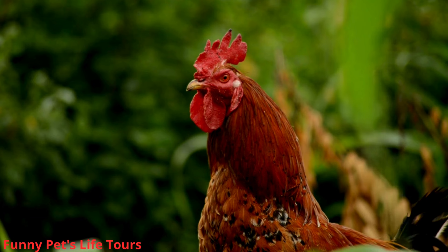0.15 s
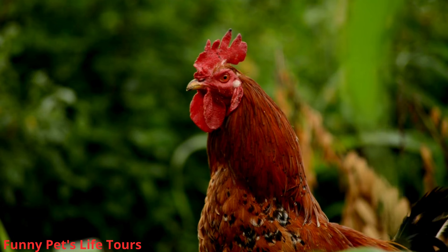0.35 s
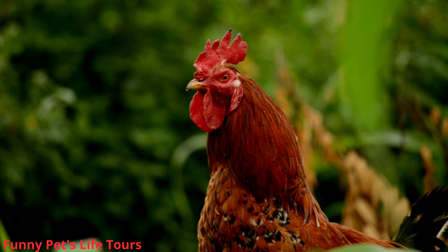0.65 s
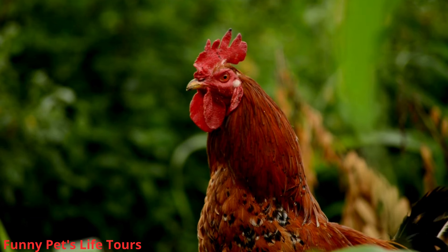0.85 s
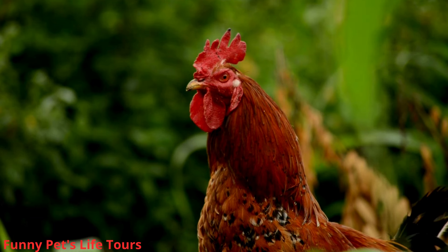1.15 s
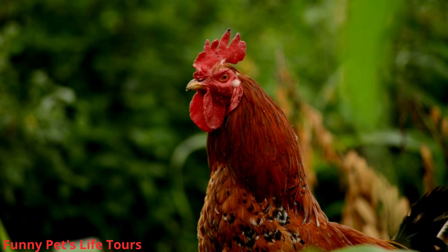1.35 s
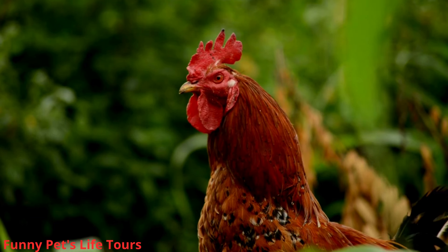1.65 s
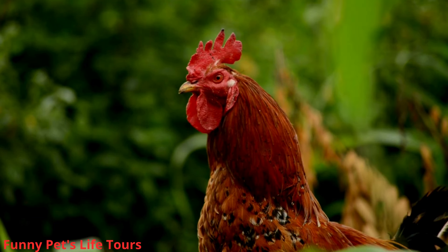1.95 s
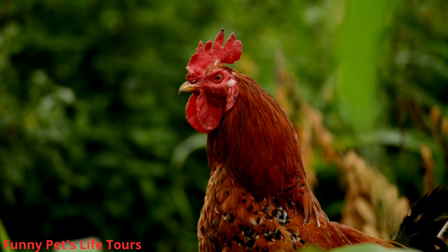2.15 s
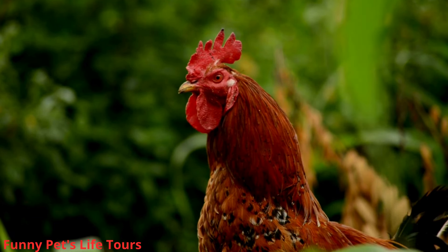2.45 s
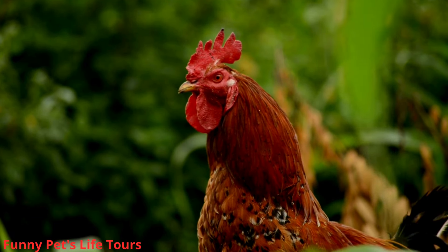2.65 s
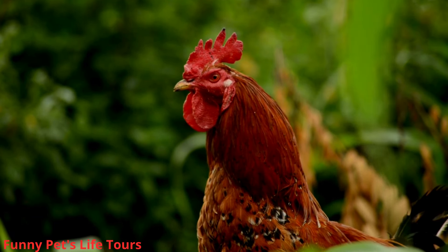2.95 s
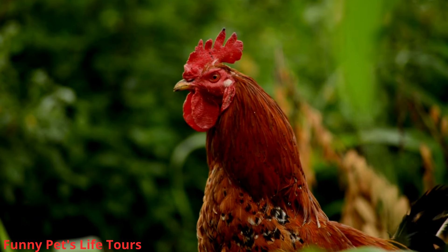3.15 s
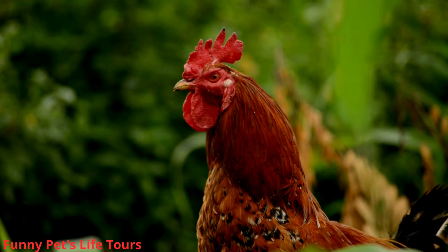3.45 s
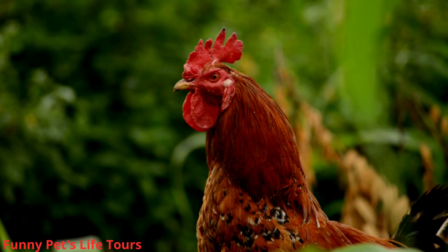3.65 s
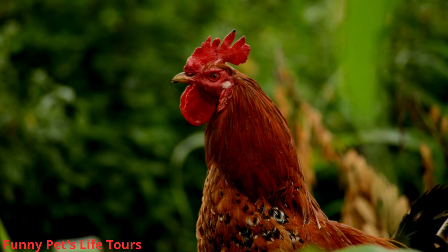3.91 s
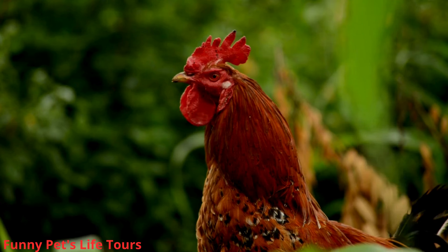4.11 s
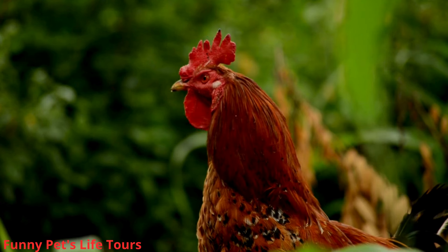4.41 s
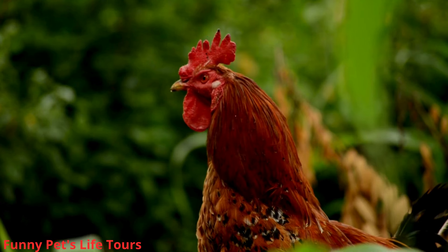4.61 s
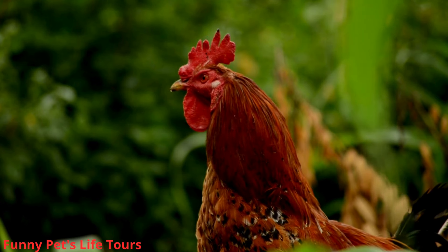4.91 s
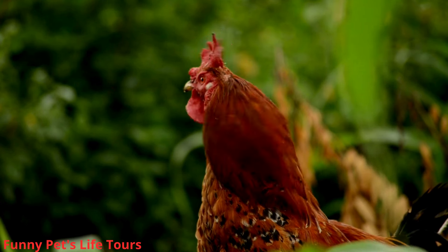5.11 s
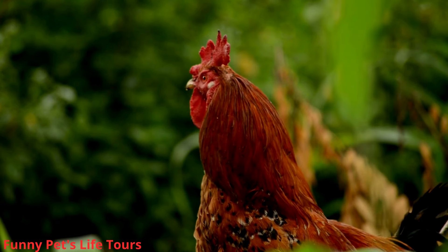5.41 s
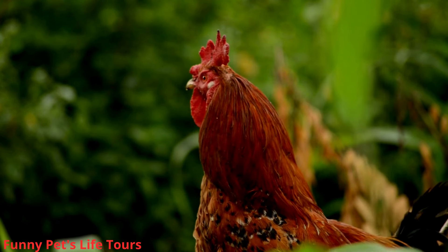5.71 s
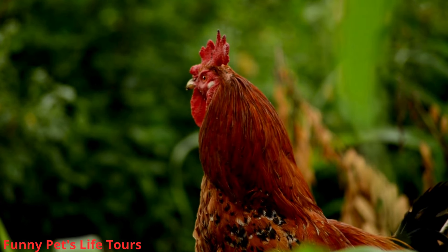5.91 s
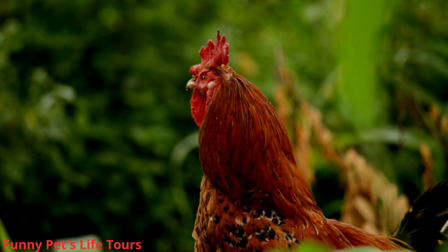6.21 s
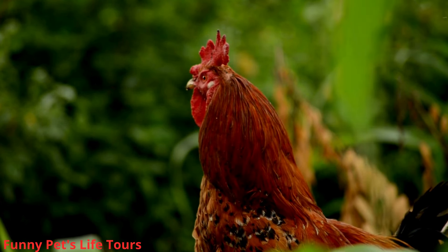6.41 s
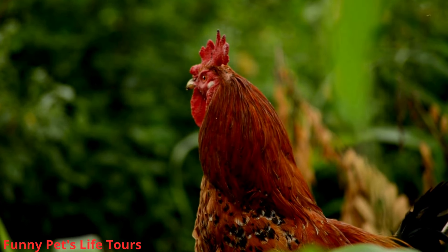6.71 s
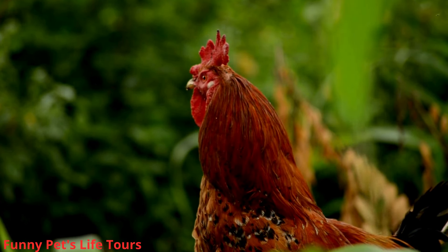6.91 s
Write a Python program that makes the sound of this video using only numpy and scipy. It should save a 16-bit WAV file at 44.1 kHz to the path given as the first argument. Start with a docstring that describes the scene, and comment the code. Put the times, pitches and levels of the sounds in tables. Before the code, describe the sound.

A rooster crows loudly close by in a breezy farmyard, hoarse then ringing on a long clear note; after near silence, a second crow begins.

```python
"""A farmyard, where a rooster crows close by: two hoarse syllables, a cracked one and a clear held note.
Two tone stacks, one for each side of his voice box, overlap and throb; filtered noise is his windpipe rasp.
Beak treble is coloured pulses and noise when hoarse, steady partials when clear; the yard adds a noise echo.
Far fowl, small birds and a motor hum are tones and narrow noise; wind, air, leaves and wash are coloured noise.
The sound fades almost to silence, then a second crow starts."""
import sys
import numpy as np
from scipy import signal
from scipy.fft import rfft, irfft, next_fast_len
from scipy.io import wavfile
from scipy.ndimage import uniform_filter1d

SR = 44100
rng = np.random.default_rng(int(sys.argv[2]) if len(sys.argv) > 2 else 0)


def wav_out(sig):
    """Save sig, one row per channel (or a flat mono array), as 16-bit PCM at SR to the path in sys.argv[1]."""
    wavfile.write(sys.argv[1], SR, np.round(np.clip(np.atleast_2d(sig).T, -1, 1) * 32767).astype(np.int16))


N = 311346
T = np.arange(N) / SR
# when each crow of the rooster starts: (first [s], second [s])
CROW_STARTS_S = (2.55, 6.025)
WIND_ENDS_S = 5.4   # the far wash stops here too


def amp(db):
    """Decibels to gain."""
    return 10 ** (np.asarray(db) / 20)


def rms_one(x):
    """Scale to rms 1."""
    return x / np.sqrt(np.mean(x ** 2) + 1e-20)


def in_time(tables):
    """Columns of one or more curve tables, joined, at every sample."""
    s, *columns = np.vstack(tables).T
    return [np.interp(T, s, column) for column in columns]


def sounding(tables, edge=.012):
    """1 while any table lasts, 0 between, with ramps of `edge` seconds outside it."""
    gates = []
    for table in tables:
        since_start = T - table[0][0] + edge
        until_end = table[-1][0] + edge - T
        gates.append(np.clip(np.minimum(since_start, until_end) / edge, 0, 1))
    return np.max(gates, axis=0)


def swell(start, length, edge):
    """Rises, holds and falls; each ramp takes the share `edge` of the length."""
    return np.clip(np.minimum(T - start, start + length - T) / (edge * length), 0, 1)


def at_hz(points, hz):
    """A spectrum table read on a log frequency axis."""
    table_hz, table_db = np.array(points).T
    return np.interp(np.log(np.maximum(hz, 1)), np.log(table_hz), table_db)


def coloured(spectrum, x=None, low_hz=0, high_hz=SR):
    """A sound (white noise if none) shaped by a spectrum between two edges, rms 1."""
    size = next_fast_len(N)
    hz = np.arange(size // 2 + 1) * SR / size
    inside = (hz >= max(low_hz, spectrum[0][0])) & (hz <= min(high_hz, spectrum[-1][0]))
    x = rng.standard_normal(N) if x is None else x
    return rms_one(irfft(rfft(x, size) * amp(at_hz(spectrum, hz)) * inside, size)[:N])


def drift(rate_hz):
    """Slow chance with spread 1: noise through two equal low-pass poles."""
    r = np.exp(-16 * np.pi * rate_hz / SR)   # made at an eighth of the sample rate
    white = rng.standard_normal(N // 8 + 4002)
    slow = signal.lfilter([1], [1, -2 * r, r * r], white)[4000:]   # settled part
    return np.interp(np.arange(N) / 8, np.arange(len(slow)), rms_one(slow))


def resonate(x, hz, width_hz):
    """One resonance, gain about 1 on top."""
    r = np.exp(-np.pi * width_hz / SR)
    poles = [1, -2 * r * np.cos(2 * np.pi * hz / SR), r * r]
    return signal.lfilter([(1 - r * r) / 2, 0, (r * r - 1) / 2], poles, x)


def cycles(hz):
    """Running phase of a pitch curve [rad]."""
    return 2 * np.pi * np.cumsum(hz) / SR


def moving_band(hz, width_hz):
    """Narrow noise around a moving centre, rms about 1: two drifts on a sine and a cosine."""
    phase = cycles(hz)
    return drift(width_hz) * np.sin(phase) + drift(width_hz) * np.cos(phase)


def last_crow_ringing():
    """The yard still rings with the crow before: narrow noise bands die away."""
    # ringing bands: (centre [Hz], level at the start [dB], time to fall 60 dB [s])
    ringing = [(666, -53.5, 0.26), (1380, -52.5, 0.5), (2070, -65, 0.25), (554, -49, 0.2)]
    return sum(amp(db - 60 * T / t60) * moving_band(hz + 0 * T, 15.0) for hz, db, t60 in ringing)


def wind():
    """Low noise: a wavering breeze that swells in gusts on the microphone."""
    # gusts: (start [s], length [s], level above the breeze [dB])
    gusts = [(0.147, 0.39, 3), (.97, 0.089, 10.5), (1.78, .12, 9.5), (2.59, 0.049, 13.5),
             (3.37, 0.39, 10.5), (3.92, 0.58, 11.5), (4.616, 0.73, 5.5)]
    # colour of the wind: (frequency [Hz], relative density [dB per Hz])
    wind_tone = [(12, -33), (20, 4.5), (39, -4), (123, -23), (151, -26.5), (220, -35), (250, -38),
                 (320, -61.5), (550, -120)]
    breeze_db, swing_db = -58, 2.5
    gust_db = sum(db * swell(s, length, edge=0.21) for s, length, db in gusts)
    level = amp(breeze_db + gust_db + swing_db * drift(12))
    return level * coloured(wind_tone) * sounding([[(0,), (WIND_ENDS_S,)]])


def air():
    """Steady outdoor air: low and middle noise whose level wavers."""
    # colour of the air: (frequency [Hz], relative density [dB per Hz])
    air_tone = [(59, -32), (100, 0.5), (285, -3.5), (394, -5), (484, -4), (611, -8.5), (2200, -22.5),
                (2860, -44.5), (4840, -120)]
    level_db, swing_db = -66.5, 3.0
    return amp(level_db + swing_db * drift(4)) * coloured(air_tone)


def leaves():
    """Leaf hiss: bright noise that follows a slow level curve."""
    # strength of the hiss: (time [s], level [dB])
    leaf_levels = [(0.0, -73), (0.95, -71), (2.14, -68.5), (4.7, -73), (5.05, -74)]
    # colour of the leaves: (frequency [Hz], relative density [dB per Hz])
    leaf_tone = [(1060, -36), (1800, 0), (1970, -3), (3710, -3.5), (4640, -5.5), (9140, -12),
                 (15600, -23.5)]
    return amp(in_time([leaf_levels])[0]) * coloured(leaf_tone)


def far_wash():
    """A far wash of farm noise: dull noise under a level curve."""
    # strength of the wash: (time [s], level [dB])
    wash_levels = [(0.0, -62), (0.72, -62), (1.46, -74), (2.5, -69), (4.75, -63), (5.05, -65)]
    # colour of the wash: (frequency [Hz], relative density [dB per Hz])
    wash_tone = [(150, -23.5), (250, -0.5), (1400, -2.5), (1640, -8), (1900, -12.5), (2480, -20.5),
                 (2600, -18.5), (3380, -48), (5720, -120)]
    level = amp(in_time([wash_levels])[0] + 1.3 * drift(10))
    return level * coloured(wash_tone) * sounding([[(0,), (WIND_ENDS_S,)]])


def motor_hum():
    """A far motor hum comes and goes: low sines waver in pitch and level."""
    # hum tones: (start [s], length [s], pitch [Hz], peak level [dB])
    hums = [(0.17, 1.4, 76, -62), (0, .3, 76, -58), (4, 0.85, 90, -60), (0, 0.59, 117, -65),
            (2.5, 1.1, 117, -61), (4.5, 0.54, 117, -60.5), (3.5, .35, 200, -67)]
    out = 0
    for s, length, hz, db in hums:
        tone = np.sin(cycles(hz * (1 + 0.018 * drift(4))))
        out = out + amp(db + 3.3 * drift(4.6)) * tone * swell(s, length, edge=0.05)
    return out


def clucks():
    """Short clucks: a noise puff excites a narrow throat resonance and a broad one."""
    # clucks: (start [s], relative level [dB], throat resonance [Hz])
    cluck_list = [(.19, -56, 1554), (.32, -68, 2510), (4.815, -54, 1510), (4.945, -65, 2560),
                  (4.95, -71, 3750), (5.18, -51, 1004), (5.185, -64, 3750)]
    out = 0
    for s, db, hz in cluck_list:
        age = np.maximum(T - s, 0) / 0.019   # the puff peaks 19 ms after its start
        puff = age * np.exp(1 - age) * rng.standard_normal(N) + 1e-18
        out = out + amp(db) * (9 * resonate(puff, hz, 53) + 0.44 * resonate(puff, 1900, 780))
    return out


def far_cock():
    """A far cock holds a note: harmonics of one wavering pitch, each drifting in level."""
    # held notes: (start [s], length [s], pitch [Hz], reference level [dB])
    notes = [(.33, 0.65, 405.5, -83), (2.197, 0.48, 398.5, -80)]
    # his tone: (multiple of the pitch, level re the note's reference [dB])
    far_partials = [(3, -46), (4, 1.5), (5, 4.5), (6, 7), (7, 8), (8, -17), (9, 3.5), (10, -0.5)]
    out = 0
    for s, length, hz, level_db in notes:
        phase = cycles(hz * (1 + 0.0064 * drift(2.96)))
        stack = sum(amp(db + 3.5 * drift(6)) * np.sin(k * phase) for k, db in far_partials)
        out = out + amp(level_db) * stack * swell(s, length, edge=.15)
    return out


def small_birds():
    """Small birds in the trees: narrow bands of noise that swell and waver."""
    # twitters: (start [s], length [s], centre [Hz], level [dB])
    twitters = [(.65, .35, 4030, -78), (1.38, 0.54, 3790, -73.5), (1.95, .3, 3720, -79)]
    out = 0
    for s, length, hz, db in twitters:
        band = moving_band(hz + 0 * T, 310.0)
        out = out + amp(db + 2 * drift(10)) * band * swell(s, length, edge=.2)
    return out


def hen():
    """A hoarse hen call sinks far off: a noise band follows her throat resonance."""
    # the call: (time [s], throat resonance [Hz], level [dB])
    hen_curve = [(1.05, 1067, -76), (1.1, 1204, -63.5), (1.2, 1108, -65), (1.31, 972, -58.5),
                 (1.43, 873, -73), (1.52, 787, -67), (1.55, 683, -60), (1.65, 599, -77)]
    hz, level_db = in_time([hen_curve])
    band = moving_band(hz, 176.0)
    return amp(level_db + 1.4 * drift(5.5)) * band * sounding([hen_curve], edge=0.033)


def membrane(pitch_hz, levels_db, hoarse, wobble, flutter_db):
    """The low partials of one side; hoarseness shakes pitch and strength. Returns sound and phase."""
    phase = cycles(pitch_hz * (1 + wobble * hoarse * drift(45)))
    partials = []
    for k, db in enumerate(levels_db, start=1):
        partials.append(amp(db + flutter_db * hoarse * drift(32)) * np.sin(k * phase))
    return np.sqrt(2) * sum(partials), phase


def windpipe_rasp():
    """Breath noise through the windpipe: each resonance acts twice, with alternating sign; rms 1."""
    # resonances: (centre [Hz], width of each pass [Hz], relative level [dB])
    windpipe = [(674, 140, 3), (1064, 180, 6), (1232, 430, -7.5), (1514, 210, 7.5), (2003, 200, 4.5),
                (2329, 180, -17.5)]
    white = rng.standard_normal(N)
    pipe = 0
    for k, (hz, width, db) in enumerate(windpipe):
        pipe = pipe + (-1) ** k * amp(db) * resonate(resonate(white, hz, width), hz, width)
    return rms_one(pipe)


def pulses(phase):
    """Sharp pulses, one a cycle, unevenly timed: equal partials 4 to 19, rms 1."""
    shaken = phase + .06 * drift(150)
    return rms_one(sum(np.sin(k * shaken) for k in range(4, 20)))


def evened(x):
    """Level held near rms 1 over about 32 ms."""
    return x / np.sqrt(uniform_filter1d(x * x, size=1400) + 1e-8)


def beak(phase, high_phase, both, hoarse, uneven, posture, bands_db):
    """Treble: shaky pulses and hiss through the throat when hoarse, steady partials when clear."""
    # beak and throat colour in the first syllable: (frequency [Hz], relative density [dB per Hz])
    opening = [(1350, -48), (2300, -18), (2510, -14.5), (3070, 3.5), (3600, -25.5), (4960, 3.5),
               (5460, -8.5), (5820, -43.5), (6300, -15), (7820, -10), (9110, -31), (9630, -19.5),
               (11300, -31), (12200, -16.5), (15600, -30)]
    # the same in the strained and cracked syllables: (frequency [Hz], relative density [dB per Hz])
    middle = [(1350, -37), (2300, -22.5), (2700, -8), (3040, -1.5), (3540, -26), (4400, -3.5), (5000, -6),
              (5590, -23), (6150, -25), (6550, -21.5), (6850, -11), (7150, -20.5), (7550, -12.5),
              (8410, -15), (10000, -21.5), (10900, -43.5), (12600, -31.5), (15600, -42)]
    # the same as the held note lets go: (frequency [Hz], relative density [dB per Hz])
    closing = [(1350, -50), (2300, -24.5), (3000, -0.5), (3190, -15.5), (4360, -20.5), (4690, -2),
               (6150, 4.5), (6990, -24.5), (7640, -14), (8010, -14), (15600, -31.5)]
    # treble of the held note: (multiple of the pitch, relative level [dB])
    clear_partials = [(4, -27.5), (5, -48.5), (6, -37.5), (7, -40.5), (8, -47.5), (9, -41.5), (10, -37),
                      (11, -42.5), (12, -49), (13, -56.5), (14, -47), (15, -55.5), (16, -59.5), (17, -54.5),
                      (18, -50.5), (19, -67.5), (20, -57), (21, -69.5), (22, -71)]
    # change after the held note slips: {multiple of the pitch: level change [dB]}
    slip_db = {6: -22, 7: 0.5, 8: 11, 10: -10}
    # borders of the separately levelled bands: (each border [Hz])
    edges_hz = (2200, 3700, 5900, 10600, 15700)
    slip_s = 4.405   # just before the held note ends

    hiss_share = .55 * hoarse
    puffs = 1 + np.sin(phase)     # air escapes once a cycle
    rough = np.sqrt(1 - hiss_share) * (uneven * pulses(phase) + both * pulses(high_phase))
    rough += np.sqrt(hiss_share) * puffs * rng.standard_normal(N)
    colour = np.interp(posture, [1, 2, 5, 6], [0, 1, 1, 2])   # crossfades the three colours
    rough = sum(np.clip(1 - abs(colour - k), 0, 1) * coloured(tone, rough)
                for k, tone in enumerate([opening, middle, closing]))

    slipped = np.clip((T - slip_s) / 0.0068, 0, 1) * (T < CROW_STARTS_S[1])
    clear = 0
    for k, db in clear_partials:
        level = amp(db + 5 * drift(5) + slip_db.get(k, 0) * slipped)
        clear = clear + level * np.sin(k * phase + k * k)   # k * k scatters the phases

    strained = np.clip(hoarse / .35, .18, 1)
    flat = [(10, 0), (SR, 0)]
    out = 0
    for low_hz, high_hz, db in zip(edges_hz, edges_hz[1:], bands_db):
        harsh = evened(coloured(flat, rough, low_hz, high_hz))
        steady = evened(coloured(flat, clear, low_hz, high_hz))
        mix = strained * amp(1.8 * drift(25)) * harsh + np.sqrt(1 - strained ** 2) * steady
        out = out + amp(db) * mix
    return out


def rooster():
    """Both sides of the voice box, rasp in the windpipe and the treble from the beak."""
    # the tune of every crow, lower side of the voice box: (time after the start [s], pitch [Hz])
    tune = [(-.02, 465), (.02, 486.4), (.05, 514.7), (.13, 536), (.23, 525), (.25, 568.6), (.275, 649.2),
            (.68, 646.9), (.76, 610), (.87, 605), (.95, 616), (1.1, 615), (1.105, 694.3), (1.165, 702.7),
            (1.2, 699), (1.22, 692.9), (1.24, 694), (1.895, 693), (1.91, 677.6), (1.92, 621), (1.95, 602.6),
            (2.05, 591)]
    # (time after the start [s], row of voicings, hoarseness [0-1], breathiness [0-1])
    postures = [(-.05, 0, .6, .3), (.025, 0, .5, 0), (.055, 1, .45, 0), (.1, 1, .3, 0), (.22, 1, .5, 0),
                (.245, 2, .8, 1), (.275, 2, .8, 0), (.69, 2, .8, 0), (.74, 2, .85, .7), (.84, 2, .85, 1),
                (.88, 3, .85, 1), (.93, 3, .8, .3), (.98, 3, .6, 0), (1.02, 3, .34, 0), (1.1, 3, .35, 0),
                (1.115, 4, .33, 0), (1.2, 4, .2, 0), (1.23, 5, 0, 0), (1.8, 6, 0, 0), (1.9, 6, 0, 0),
                (1.918, 7, .8, 0), (3.0, 7, .8, 0)]
    # one row a posture, from the attack to letting go: (2nd, 3rd, 4th partial, rasp [dB re overtones],
    # treble near 4.7 kHz, at 6-10 kHz, at the top [dB re treble])
    voicings = [(-9, 0.5, -16.5, -10.5, -2.5, -15, -23), (-1, -11, -6.5, -6, -3, -7.5, -18),
                (-3, -5.5, -24, -6, -1, -4, -22.5), (0, -10.5, -37.5, -6, -0.5, -7, -16.5),
                (2.4, -15, -28.5, -22, 1.5, -13.5, -19.5), (1.9, -5.5, -61, -50.5, -2, -3, -8),
                (1, -20, -63, -55, 0, -3, -21.5), (-3.5, -22, -50, -5.5, -3.5, -1, -17.5)]
    # effort in stretches of the crows: (time [s], fundamental [dB], overtones [dB],
    # ring near 3 kHz [dB], treble [dB])
    effort = [
        [(2.53, -74, -75, -73, -72), (2.54, -57, -66, -70, -77), (2.568, -48, -35.5, -53.5, -53.5),
         (2.614, -39.5, -37, -51, -49.5), (2.654, -46, -42, -58, -49), (2.662, -42, -42, -52, -50),
         (2.706, -52, -41, -55, -48), (2.742, -73, -44, -64, -57.5), (2.776, -66, -68, -66, -65),
         (2.79, -61, -51, -70, -76)],
        [(2.79, -41, -55, -71, -75), (2.824, -36, -36.5, -50, -57), (2.85, -23, -32.5, -45, -51),
         (2.882, -35.5, -32.5, -45, -48.5), (2.904, -28.5, -28.5, -42, -49.5), (3.014, -32, -34.5, -45, -47.5),
         (3.192, -28, -28.5, -43.5, -47), (3.322, -44.5, -38, -48, -51), (3.382, -38.5, -47.5, -56.5, -65.5),
         (3.41, -42, -50, -51, -65)],
        [(3.41, -46, -47.5, -49, -58), (3.424, -32.5, -43, -54, -57), (3.446, -60.5, -34, -48, -54),
         (3.476, -28.5, -33.5, -44.5, -52.5), (3.5, -49, -32.5, -51.5, -49), (3.532, -40, -37.5, -42, -50.5),
         (3.55, -52.5, -37, -55.5, -48.5), (3.612, -45.5, -37.5, -50.5, -53), (3.63, -48.5, -46.5, -47, -51),
         (3.655, -36, -38.5, -41.5, -53)],
        [(3.655, -37.5, -36, -49, -50.5), (3.699, -32.5, -27, -51, -48), (3.707, -35, -27, -60.5, -52),
         (3.737, -29, -29, -53.5, -45), (3.783, -32, -29, -53, -54.5), (4.015, -32.5, -25, -49.5, -58),
         (4.055, -33, -23.5, -54.5, -53), (4.103, -33, -23.5, -53, -54.5), (4.349, -32, -21, -52.5, -51.5),
         (4.37, -35, -22.5, -58, -51.5)],
        [(4.375, -40.5, -21.5, -60, -52.5), (4.389, -35.5, -18.5, -51.5, -52), (4.401, -40, -21, -59.5, -50),
         (4.443, -34, -28.5, -53, -52.5), (4.45, -36, -35, -52, -62)],
        [(4.455, -33.5, -24.5, -57, -52), (4.467, -35, -27.5, -66, -47.5), (4.477, -32, -51, -57, -48.5),
         (4.499, -42, -36, -64, -51), (4.517, -48, -44, -57.5, -52.5), (4.537, -46.5, -52.5, -78, -61),
         (4.575, -66, -63, -76, -70), (4.6, -61, -55, -83, -69)],
        [(5.99, -82, -88.5, -93, -92), (6.018, -56, -58, -80, -81.5), (6.036, -48.5, -42, -65, -63),
         (6.052, -45.5, -42, -60, -52.5), (6.086, -51, -37, -50.5, -53), (6.14, -55.5, -50.5, -61, -52),
         (6.178, -52, -42, -62, -51), (6.212, -73, -48, -64, -62), (6.254, -61.5, -56, -78, -68),
         (6.265, -54, -61, -70, -76)],
        [(6.265, -55, -47.5, -68, -75), (6.307, -28, -37.5, -47, -52), (6.349, -33, -32, -50, -51.5),
         (6.379, -26.5, -35, -43, -48), (6.501, -33, -36, -48.5, -52), (6.529, -29.5, -31, -49, -50.5),
         (6.631, -30.5, -34, -40, -48.5), (6.697, -28.5, -32.5, -47, -49.5), (6.755, -42.5, -37, -47, -48),
         (6.885, -47, -47.5, -60, -68)],
        [(6.885, -49, -46, -49, -62), (6.893, -32, -43.5, -57, -62), (6.905, -47, -41, -48, -56),
         (6.921, -66, -44.5, -50, -54), (6.939, -31.5, -36, -50, -49.5), (6.961, -33.5, -34, -50, -54),
         (6.993, -35.5, -35.5, -54, -50.5), (7.005, -34, -40, -48, -54.5), (7.037, -35, -37, -51, -54),
         (7.06, -43, -37.5, -50, -50)],
    ]
    # the other side joins in and takes over by turns; the third stretch is the lower side's old pitch lingering
    # briefly after it jumps to the held note: (time [s], pitch [Hz], share of the voice [0-1])
    other_side = [
        [(2.57, 591.4, 0), (2.61, 582.2, 0.28), (2.67, 584.7, 0.35), (2.74, 568, .02)],
        [(2.85, 729.2, 0.2), (2.88, 763, 1), (2.95, 771.8, 0.65), (3.0, 743, 0), (3.05, 721.8, .02),
         (3.07, 719.7, 0.9), (3.16, 777.2, 1), (3.2, 728.8, 0.53), (3.25, 747.3, 0)],
        [(3.65, 639.7, 0.67), (3.7, 635.6, 0.01), (3.76, 672, 0.04)],
        [(6.05, 575.5, 0.25), (6.065, 572.6, 0.1), (6.19, 562.4, 0)],
        [(6.32, 740, .2), (6.38, 750, 1), (6.43, 755.3, 0.82), (6.48, 751, 0.04), (6.53, 719.5, 0),
         (6.56, 739.5, 0.89), (6.64, 716, 0.97), (6.69, 758.4, 0.39), (6.74, 711, 0.1)],
    ]
    # its overtones: (2nd partial, 3rd partial [dB re overtones])
    other_partials_db = (-1, -14.5)
    # cracked syllable, where every third cycle is stronger: (time [s], depth [0-1])
    cracks = [(3.51, 0), (3.54, .9), (3.63, .9), (3.655, 0)]
    # what full breathiness takes from the lower side and gives to the rasp
    breathy_tone_db, breathy_rasp_db = -7, 9

    pitch, = in_time([np.add(tune, [s, 0]) for s in CROW_STARTS_S])
    posture, hoarse, breathy = in_time([np.add(postures, [s, 0, 0, 0]) for s in CROW_STARTS_S])
    voicing = [np.interp(posture, range(len(voicings)), column) for column in np.transpose(voicings)]
    first_db, voice_db, ring_db, treble_db = uniform_filter1d(in_time(effort), size=300)   # 7 ms
    other_pitch, share = in_time(other_side)
    both = sounding(other_side)
    share = np.clip(share, 0, 1) * both
    crack, = in_time([cracks])

    low_db = [first_db] + [voice_db + db for db in voicing[:3]]
    low, phase = membrane(pitch, low_db, hoarse, wobble=.008, flutter_db=4)
    uneven = 1 + crack * np.cos(phase / 3) + 0.54 * crack * np.cos(2 * phase / 3 + 1)

    rasp_db = voice_db + voicing[3] + breathy_rasp_db * breathy + 2.7 * drift(30)
    rasp = amp(rasp_db) * windpipe_rasp() * np.minimum(hoarse / 0.11, 1)

    high_db = [first_db] + [voice_db + db for db in other_partials_db]
    high, high_phase = membrane(other_pitch, high_db, hoarse, wobble=.025, flutter_db=2.5)
    high *= 1 + .5 * np.sin(cycles(55 + 9 * drift(14.32)))   # it throbs against the lower side

    voice = amp(breathy_tone_db * breathy) * np.sqrt(1 - share) * uneven * low
    voice += rasp + np.sqrt(share) * high
    crowing = sounding(effort)
    short_pipe = signal.butter(6, 470, "high", fs=SR, output="sos")   # the short pipe passes no lows
    voice = signal.sosfilt(short_pipe, voice * crowing)
    bands_db = [ring_db] + [treble_db + db for db in voicing[4:]]
    return voice + crowing * beak(phase, high_phase, both, hoarse, uneven, posture, bands_db)


def yard(x):
    """Scattered echoes from sheds and trees: a dull, decaying noise tail of unit energy."""
    t60_s, cut_hz, rise_s = 0.46, 5600, 0.071
    t = T[:SR]
    tail = rng.standard_normal(SR) * amp(-60 * t / t60_s) * np.minimum(t / rise_s, 1)
    tail = signal.sosfilt(signal.butter(1, cut_hz, fs=SR, output="sos"), tail)
    return signal.fftconvolve(x, tail / np.sqrt(np.sum(tail ** 2)))[:N]


def coo():
    """Faint falling coos: gliding sines that swell and fade."""
    # coos: (start [s], length [s], first pitch [Hz], last pitch [Hz], peak level [dB])
    coos = [(3.738, 0.21, 370, 310, -60), (6.016, 0.23, 462, 405, -59.5), (6.497, .32, 475, 420, -57.5),
            (6.88, 0.25, 455, 407, -56)]
    out = 0
    for s, length, first_hz, last_hz, db in coos:
        glide_hz = np.interp(T, [s, s + length], [first_hz, last_hz])
        out = out + amp(db) * np.sin(cycles(glide_hz)) * swell(s, length, edge=0.3)
    return out


def scene():
    """The rooster, his echo and the yard, in one channel."""
    yard_db = -18.5
    background = wind() + air() + leaves() + far_wash() + motor_hum() + small_birds()
    far_fowl = last_crow_ringing() + clucks() + far_cock() + hen() + coo()
    cock = rooster()
    return (cock + amp(yard_db) * yard(cock) + far_fowl + background)[None]


def record(dry):
    """Adds microphone hiss, fades almost to silence between the crows and cuts the top."""
    # level of everything, hiss included: (time [s], level [dB])
    fade = [(5.05, -1), (5.2, -7), (5.3, -18.5), (5.37, -69), (5.96, -67), (6.0, -4), (6.04, -1)]
    hiss_db, cutoff_hz = -78.5, 15700   # hiss before the fade
    hissy = dry + amp(hiss_db) * rng.standard_normal(N)
    faded = hissy * amp(in_time([fade])[0])
    return signal.sosfilt(signal.ellip(10, .5, 70, cutoff_hz, fs=SR, output="sos"), faded)


dry = scene()
out = record(dry)
wav_out(out)
```